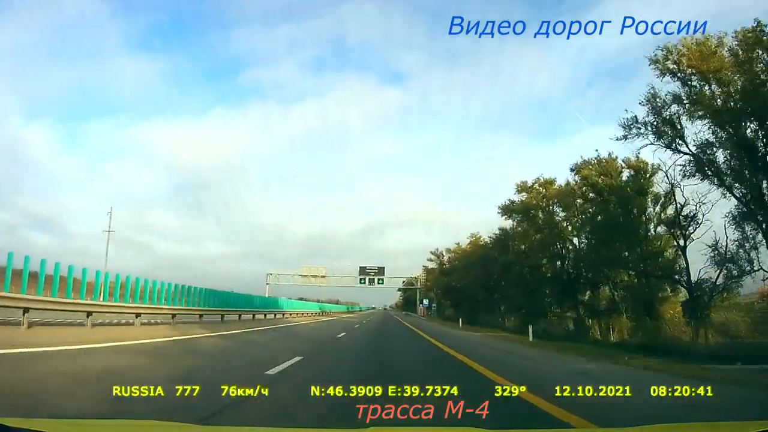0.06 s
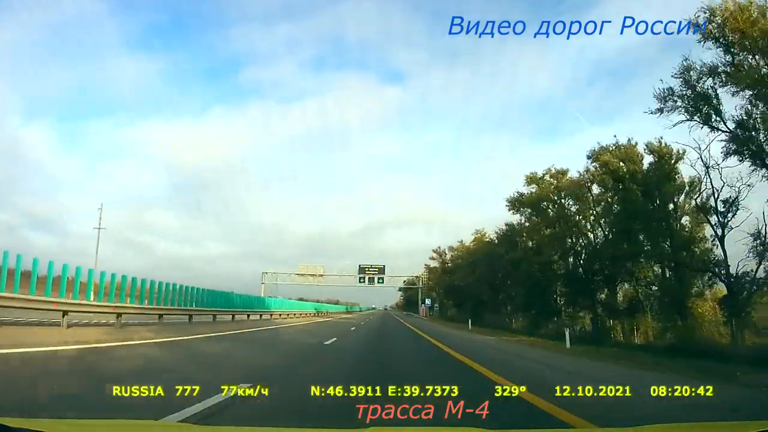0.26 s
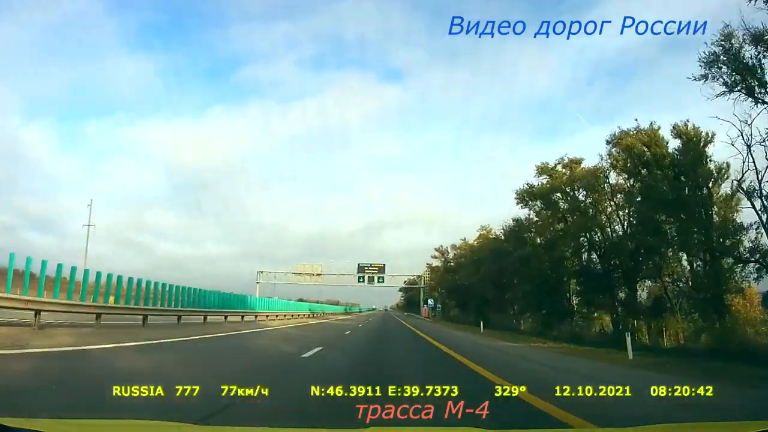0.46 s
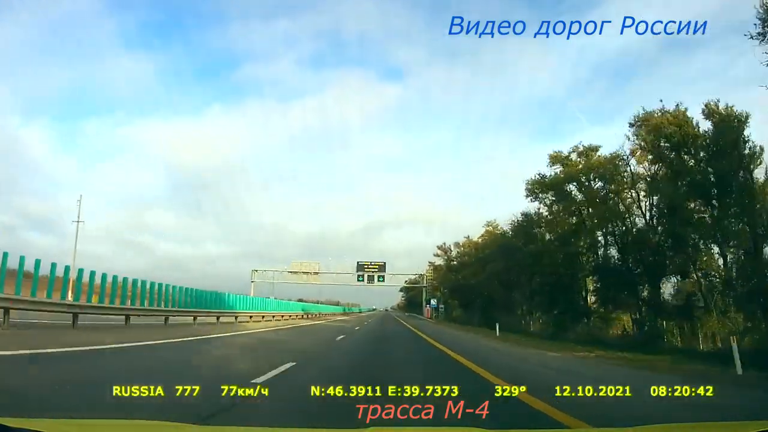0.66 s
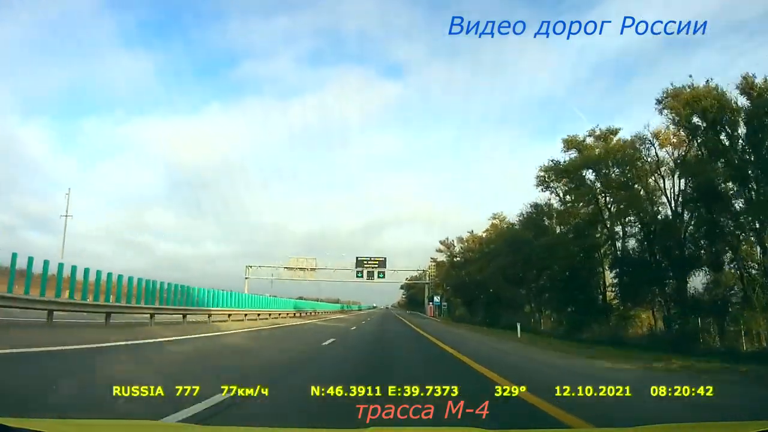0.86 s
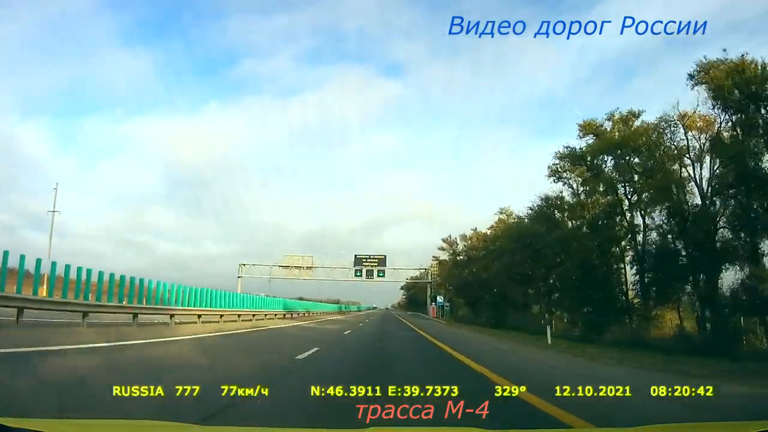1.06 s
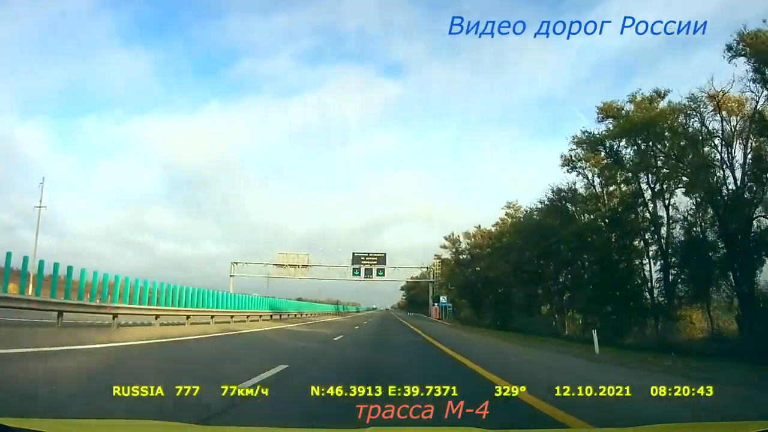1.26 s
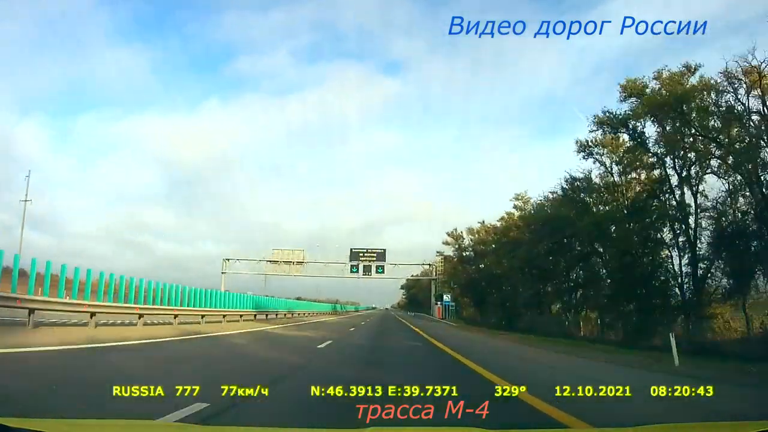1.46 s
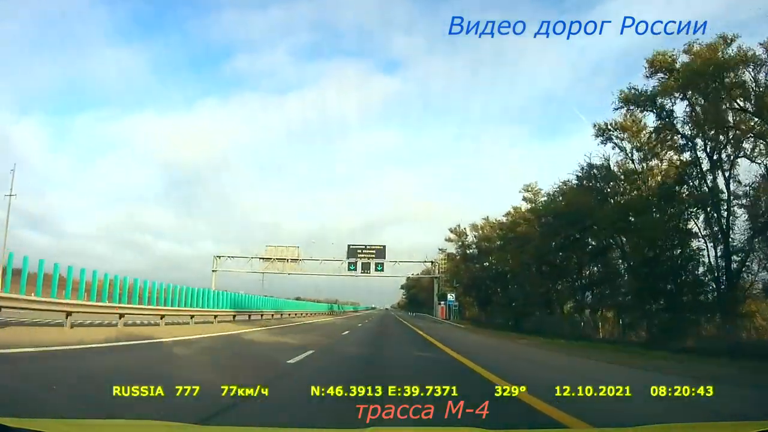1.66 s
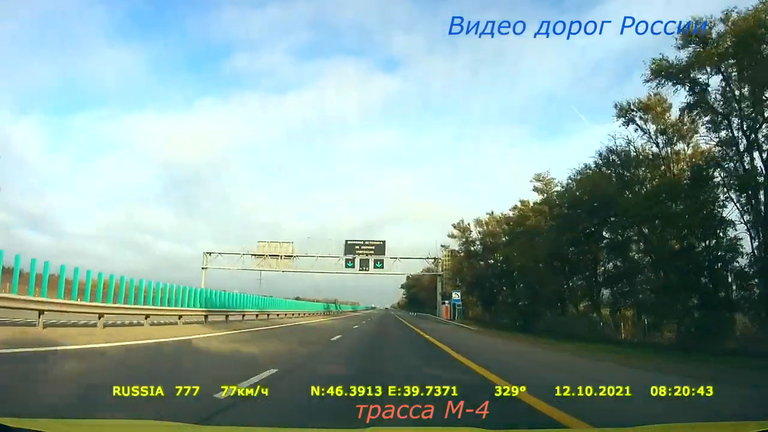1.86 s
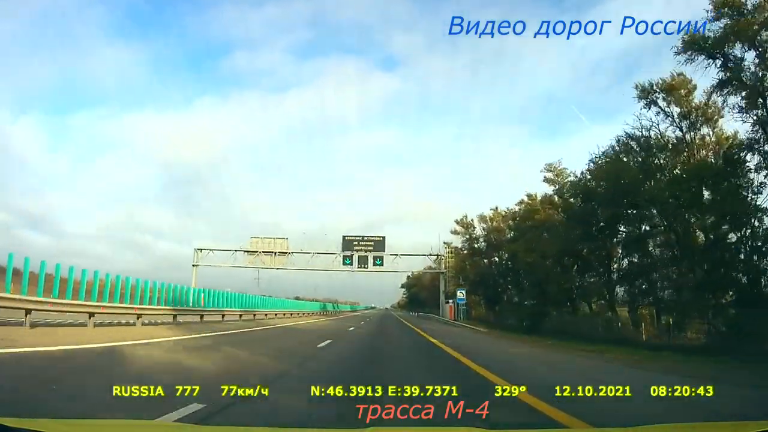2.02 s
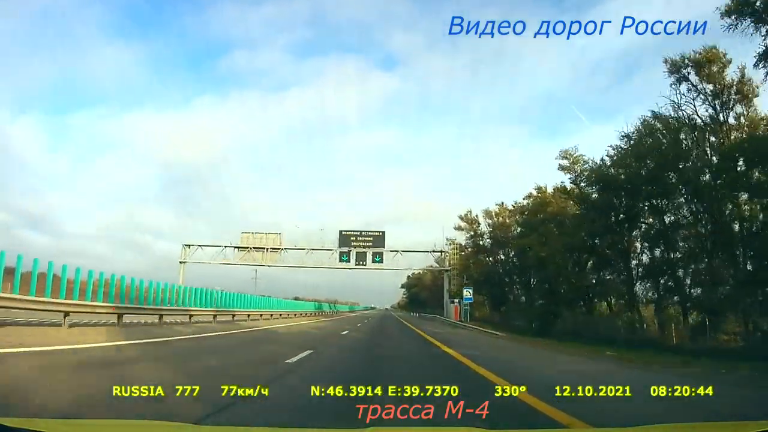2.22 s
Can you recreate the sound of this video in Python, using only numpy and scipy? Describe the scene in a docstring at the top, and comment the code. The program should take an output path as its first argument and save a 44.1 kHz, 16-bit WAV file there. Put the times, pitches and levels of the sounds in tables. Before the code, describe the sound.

Constant road noise fills a closed car cabin on a motorway, low rumble beneath a breathy roar and light wind. The small dashboard microphone is hissy, with tiny high-pitched chirps several times a second; nothing passes.

```python
"""Tyres roll over smooth asphalt, heard inside a cruising car by a dashboard camera. Road texture shakes them; body
and cabin ring with it: a rumble, the hum of the air in the tyres and a roar near 1 kHz, all made of filtered noise.
Wind hisses at the windscreen: noise of uneven strength. The camera adds short electrical beeps with a puff
of fizz (gated tones and noise), faint whines (sine tones), its own hiss (noise) and a steady offset."""
import sys
import numpy as np
from scipy import signal
from scipy.fft import rfft, irfft, next_fast_len
from scipy.io import wavfile
from scipy.ndimage import uniform_filter1d

SR = 44100
rng = np.random.default_rng(int(sys.argv[2]) if len(sys.argv) > 2 else 0)


def digitize_waveform(pressure):
    """Quantize a signal to 16-bit integers and store it at the path in sys.argv[1].

    Rows of a 2-D input are taken as channels; values are limited to [-1, 1].
    """
    field = np.atleast_2d(pressure).T
    bounded = np.clip(field, -1, 1)
    quanta = np.round(bounded * 32767).astype(np.int16)
    wavfile.write(sys.argv[1], SR, quanta)


N = 100900  # length in samples

# Spectrum of the body rumble: f/Hz, relative level per Hz/dB
RUMBLE_SPECTRUM = [(12, -40), (19, 4.5), (25, -2.5), (35, -3.5), (45, -1.5), (62, -12.5), (110, -11),
                   (160, -16.5), (280, -20.5), (400, -22), (700, -27.5), (1000, -60)]
# Resonances of tyres and cabin: f/Hz, width/Hz, level/dB
CABIN_RESONANCES = [(216.8, 29, -43.5), (334, 31, -48), (468, 75, -45.5), (581.5, 106, -45), (783, 72, -48),
                    (855, 60, -36.5), (972.6, 51, -36), (1088, 110, -32.5), (1312, 70, -38.5),
                    (1448, 143, -38), (1584, 133, -42.5), (1740, 100, -49.5), (1912, 86, -50.5),
                    (2093, 180, -48)]
# Spectrum of the wind at the windscreen: f/Hz, relative level per Hz/dB
WIND_SPECTRUM = [(900, -30), (1700, -13), (2300, -1), (3000, -6.5), (3700, -7), (4500, -12.5),
                 (6500, -22.5), (10000, -42)]
# Electrical beeps of the camera: t/s, length/s, level/dB
BEEP_TIMES = [(0.099, 0.02, -45.8), (0.39, 0.022, -46.5), (0.507, 0.026, -47), (0.695, 0.023, -46),
              (0.904, 0.033, -47.9), (1.144, 0.024, -47.7), (1.379, 0.019, -46), (1.553, 0.03, -47),
              (1.706, 0.028, -46.4), (1.937, 0.024, -48.7), (2.102, 0.026, -46.5)]
# Faint whines of the camera: f/Hz, level/dB, sway/dB
WHINE_TONES = [(7882, -66, 2), (8603, -74, 4)]
# Spectrum of the camera hiss: f/Hz, relative level per Hz/dB
HISS_SPECTRUM = [(1500, -12.5), (4000, -1), (8000, 0), (12000, -1.5), (16000, -1.5)]

# Names tell the units: _DB in dB, _HZ in Hz, _S in seconds
RUMBLE_DB, RUMBLE_SWAY_DB, RUMBLE_SWAY_HZ = -32.5, 0.27, 2.4
SWELL_DB, SWELL_HZ = 0.3, 3.65  # shared by all resonances
FLICKER_DB, FLICKER_HZ = 0.7, 9  # separate for each resonance
FLUTTER_DB, FLUTTER_HZ = 0.62, 40.06  # quick, shared by road and wind
WIND_DB, WIND_GRAIN_DB, WIND_FLICKER_DB, WIND_FLICKER_HZ = -45, 2.5, 0.27, 17
BEEP_HZ, BEEP_DRIFT_HZ, BEEP_EDGE_S = 9492, 12, 0.0015  # drift: random change of pitch from beep to beep
FIZZ_HZ, FIZZ_WIDTH_HZ, FIZZ_EDGE_S = 9600, 3000, 0.014
FIZZ_DB, FIZZ_GRAIN_DB = 1, 1.5  # the fizz level is relative to the beep
WHINE_SWAY_HZ = 15.2
HISS_DB, HISS_GRAIN_DB, HISS_FLICKER_DB, HISS_FLICKER_HZ = -44, 2, 0.55, 22
OFFSET = 0.1167  # as a part of full scale
TOP_HZ = 15735


def road():
    """Road texture drives the rumble and each resonance; resonances swell together, each flickers alone."""
    rumble = coloured(rng.standard_normal(N), RUMBLE_SPECTRUM)
    out = undb(RUMBLE_DB + RUMBLE_SWAY_DB * walk(RUMBLE_SWAY_HZ)) * rumble
    swell = SWELL_DB * walk(SWELL_HZ)
    for hz, width_hz, db in CABIN_RESONANCES:
        ring = resonance(rng.standard_normal(N), hz, width_hz)
        flicker = FLICKER_DB * walk(FLICKER_HZ)
        out = out + undb(db + swell + flicker) * ring
    return out


def wind():
    """Dense eddies of uneven size hiss at the windscreen, with a slight flicker in level."""
    hiss = coloured(grains(WIND_GRAIN_DB), WIND_SPECTRUM)
    return undb(WIND_DB + WIND_FLICKER_DB * walk(WIND_FLICKER_HZ)) * hiss


def camera_beeps():
    """Each electrical beep switches on a tone and, with softer edges, a band of fizzing noise."""
    fizz = undb(FIZZ_DB) * resonance(grains(FIZZ_GRAIN_DB), FIZZ_HZ, FIZZ_WIDTH_HZ)
    drifts = BEEP_DRIFT_HZ * rng.standard_normal(len(BEEP_TIMES))
    out = np.zeros(N)
    for (start, length, db), drift in zip(BEEP_TIMES, drifts):
        beep = gate(start, length, BEEP_EDGE_S) * tone(BEEP_HZ + drift)
        puff = gate(start, length, FIZZ_EDGE_S) * fizz
        out = out + undb(db) * (beep + puff)
    return out


def camera_whines():
    """Faint steady pitches whose levels sway at random."""
    return sum(undb(db + sway_db * walk(WHINE_SWAY_HZ)) * tone(hz) for hz, db, sway_db in WHINE_TONES)


def camera_hiss():
    """Uneven noise from the camera itself, with a flickering level."""
    hiss = coloured(grains(HISS_GRAIN_DB), HISS_SPECTRUM)
    return undb(HISS_DB + HISS_FLICKER_DB * walk(HISS_FLICKER_HZ)) * hiss


def undb(db):
    """Turn dB into a gain."""
    return 10 ** (np.asarray(db) / 20)


def filtered(x, gain_at):
    """Weight each frequency of x by a gain, then bring the result to rms 1."""
    size = next_fast_len(N)
    hz = np.arange(size // 2 + 1) * SR / size + 1e-3  # just above zero, to allow logs and division
    y = irfft(rfft(x, size) * gain_at(hz), size)[:N]
    return y / np.sqrt(np.mean(y ** 2))


def coloured(x, spectrum):
    """Shape x by a spectrum, drawn as straight lines in dB over log frequency."""
    hz, db = np.array(spectrum).T

    def gain_at(f):
        return undb(np.interp(np.log(f), np.log(hz), db, left=-90, right=-90))

    return filtered(x, gain_at)


def resonance(x, hz, width_hz):
    """Ring x at one frequency; the resonance is applied twice, for steep flanks."""
    # 1.51 makes up for the narrowing when applied twice
    return filtered(x, lambda f: 1 / (1 + 1j * (f - hz ** 2 / f) / (1.51 * width_hz)) ** 2)


def walk(rate_hz):
    """Wander at random: levels held for 1 / rate seconds, smoothed twice; spread near 1."""
    k = int(SR / rate_hz)
    held = np.resize(np.repeat(rng.standard_normal(128), k), N)
    smooth = uniform_filter1d(uniform_filter1d(held, k), k)
    return 1.3 * smooth  # makes up for the spread lost in smoothing


def grains(grain_db):
    """Noise of uneven strength: each sample gets a random boost, grain_db on average."""
    return rng.standard_normal(N) * undb(grain_db * rng.exponential(size=N))


def tone(hz):
    """A sine wave of rms 1."""
    return np.sqrt(2) * np.sin(2 * np.pi * hz * np.arange(N) / SR)


def gate(start, length, edge_s):
    """Open and close along straight ramps of edge_s seconds, 70 % open at the start and end times."""
    t = np.arange(N) / SR
    inside = np.minimum(t - start, start + length - t)  # seconds to the nearer end
    return np.clip(inside / edge_s + 0.7, 0, 1)


def scene():
    """Road and wind flutter together; the camera adds its own sounds; one channel."""
    flutter = undb(FLUTTER_DB * walk(FLUTTER_HZ))
    camera = camera_beeps() + camera_whines() + camera_hiss()
    return (flutter * (road() + wind()) + camera)[None]


def record(dry):
    """The converter cuts the top with a steep low-pass filter and sits off centre."""
    low_pass = signal.ellip(16, 0.3, 80, TOP_HZ, fs=SR, output="sos")  # 0.3 dB ripple, 80 dB cut
    return OFFSET + signal.sosfilt(low_pass, dry)


dry = scene()
out = record(dry)
digitize_waveform(out)
```